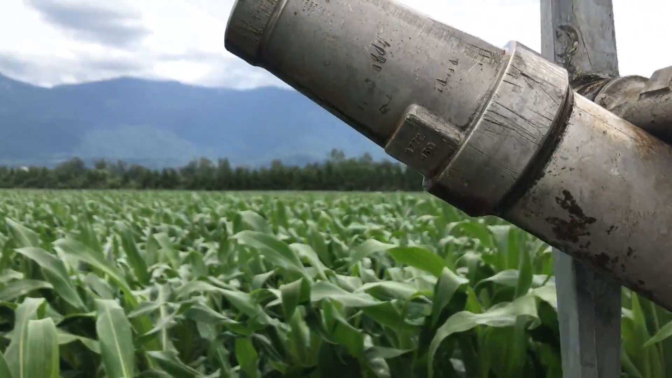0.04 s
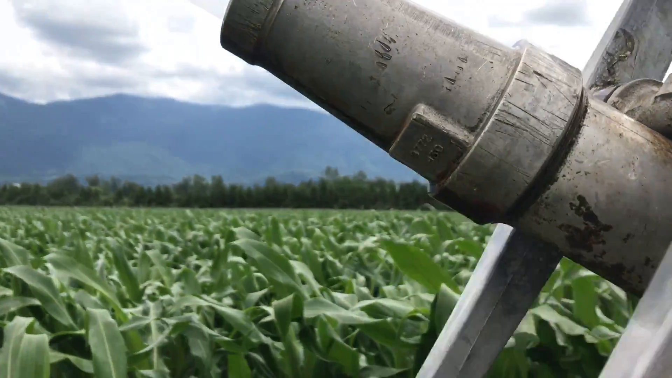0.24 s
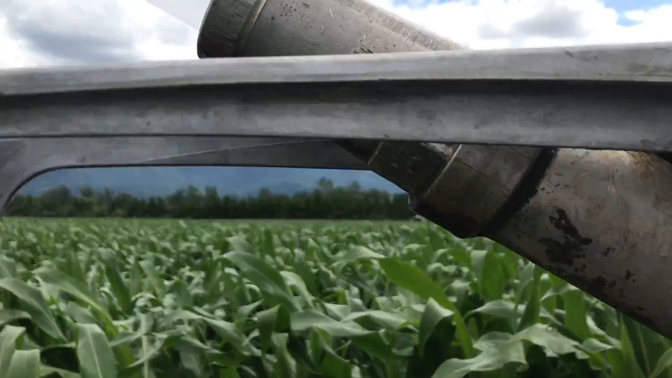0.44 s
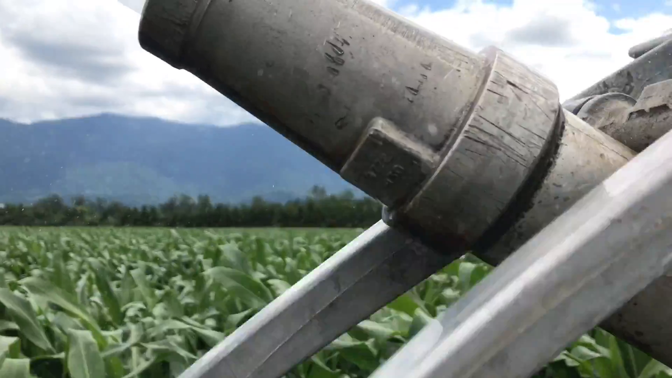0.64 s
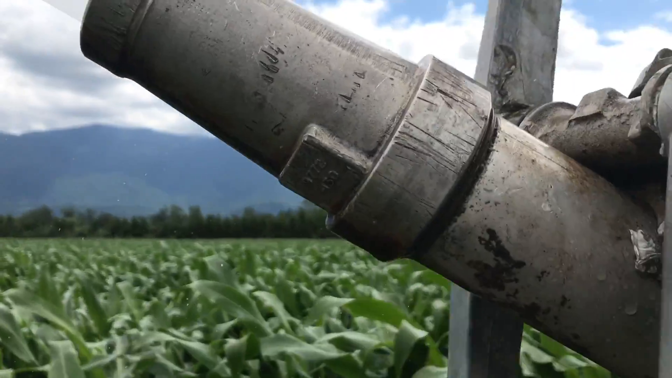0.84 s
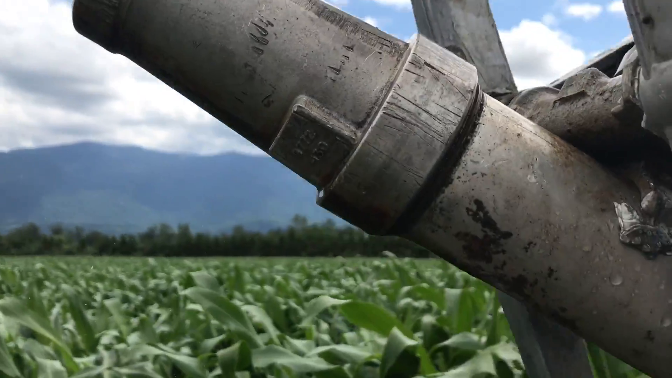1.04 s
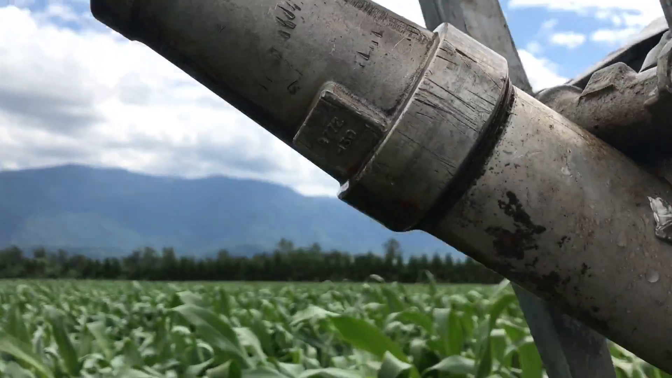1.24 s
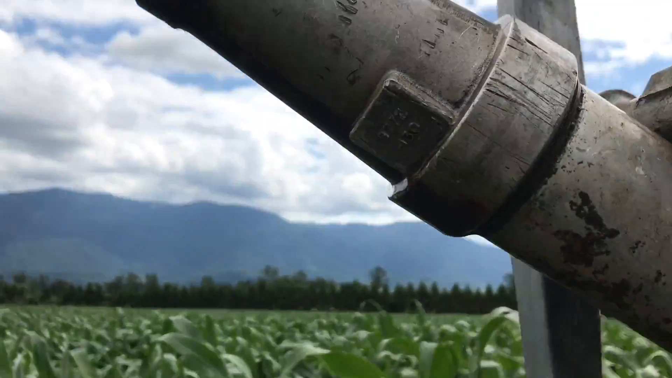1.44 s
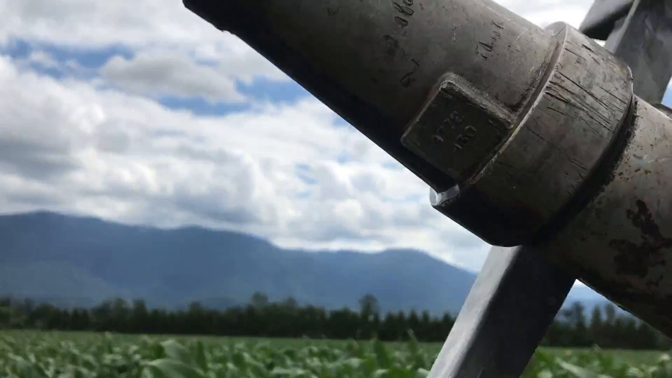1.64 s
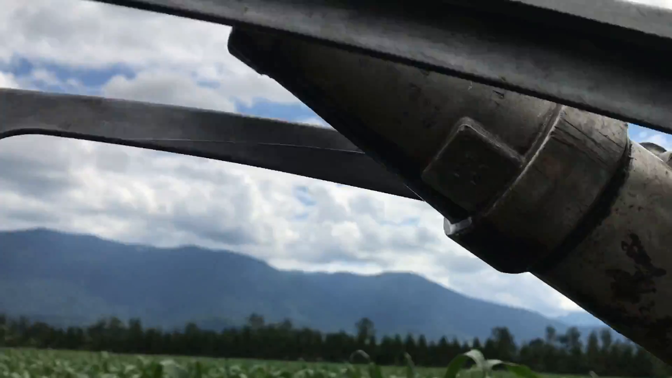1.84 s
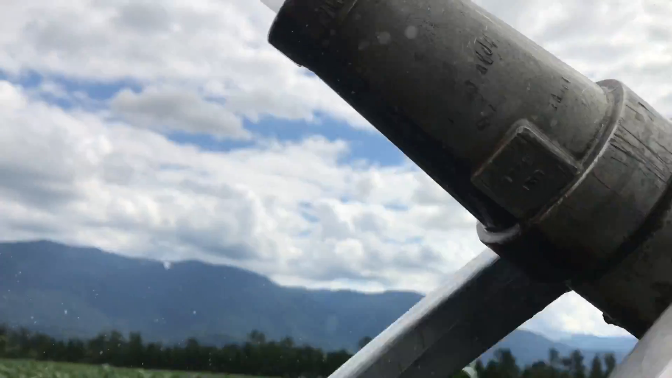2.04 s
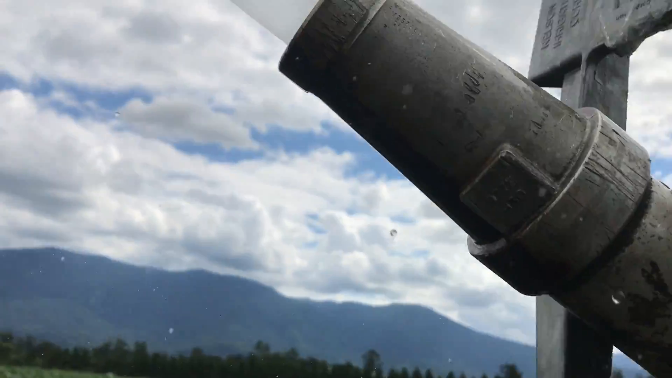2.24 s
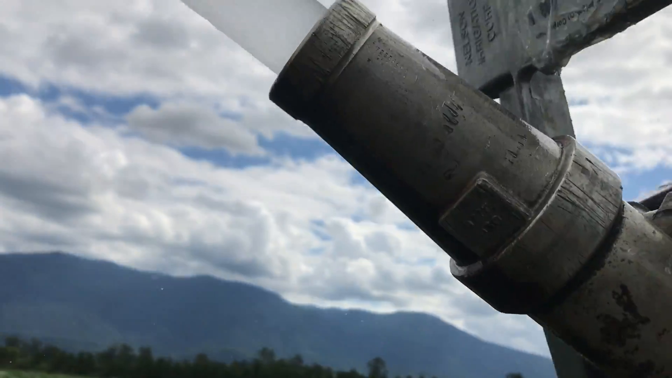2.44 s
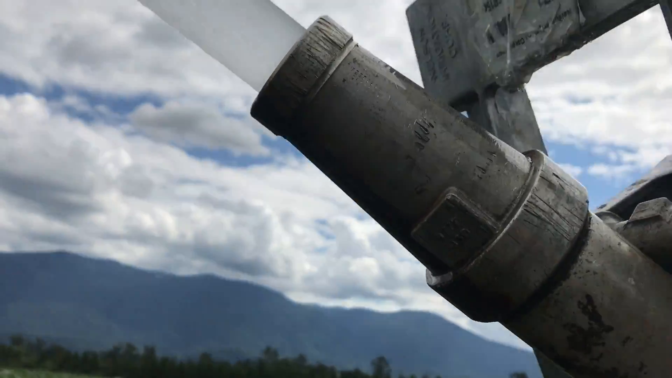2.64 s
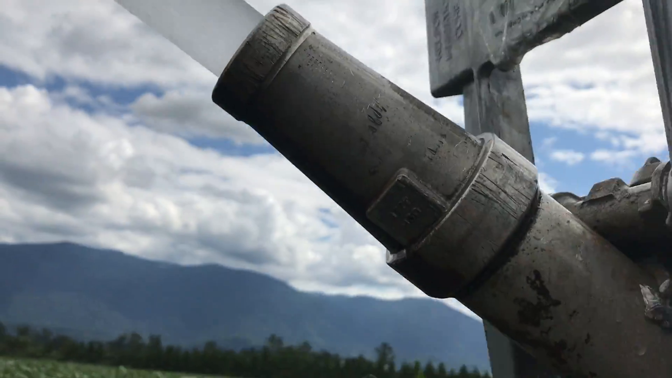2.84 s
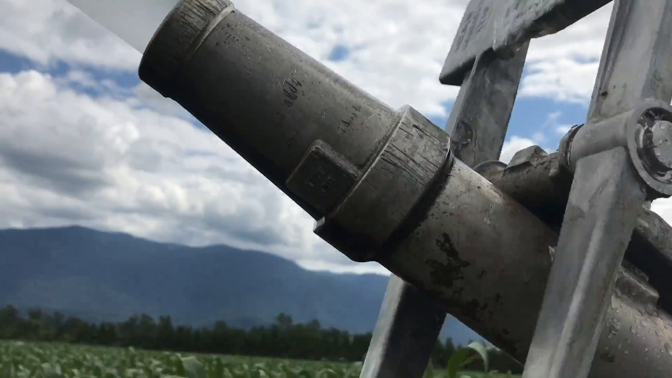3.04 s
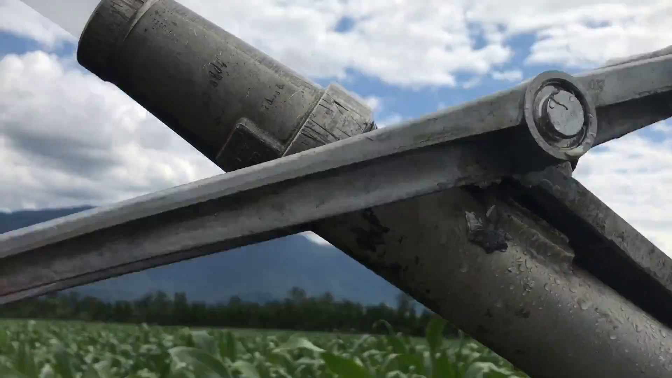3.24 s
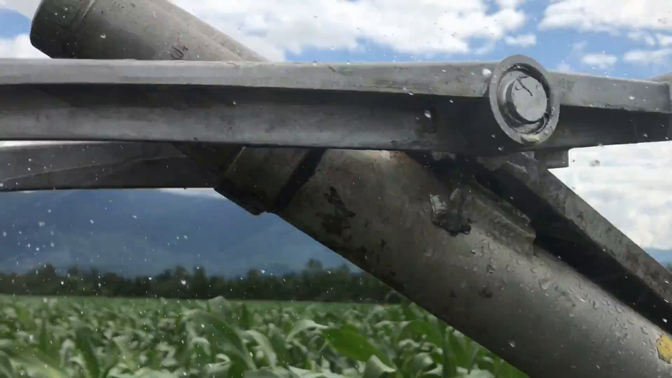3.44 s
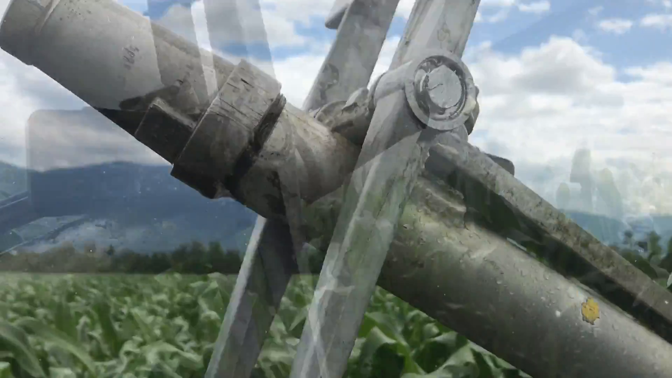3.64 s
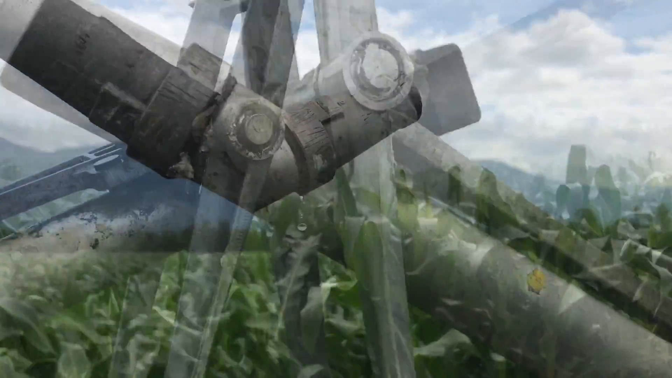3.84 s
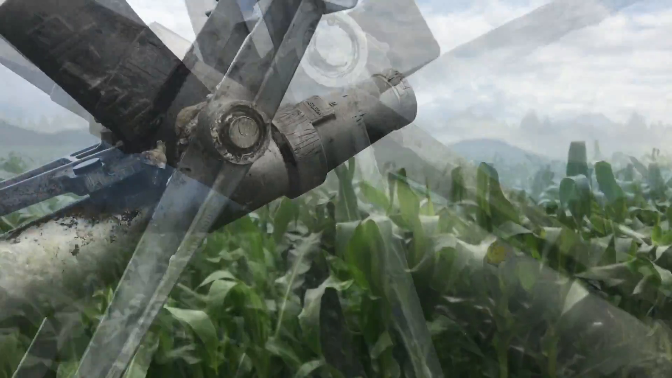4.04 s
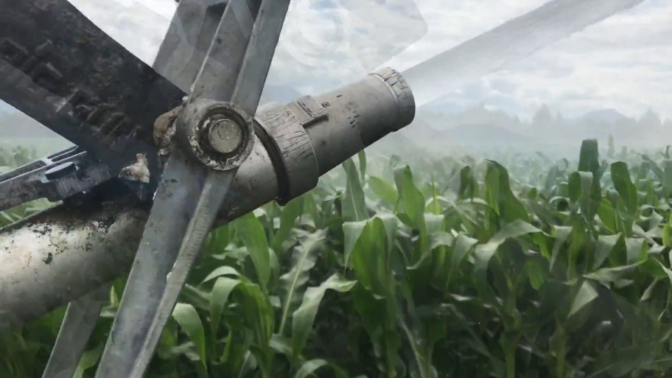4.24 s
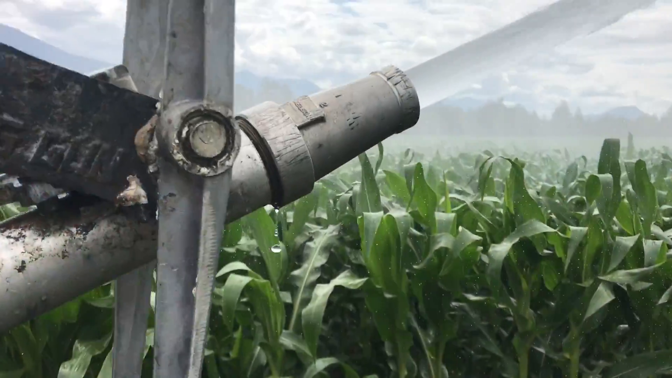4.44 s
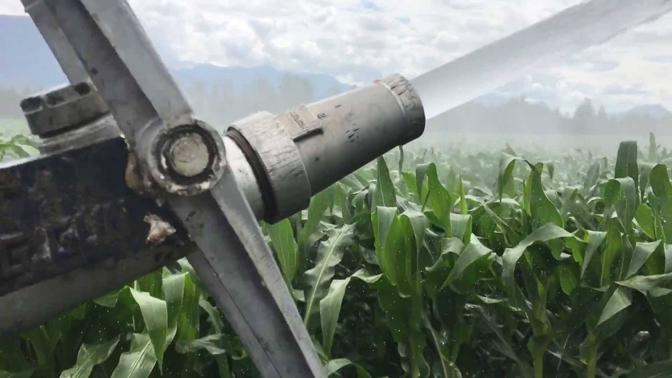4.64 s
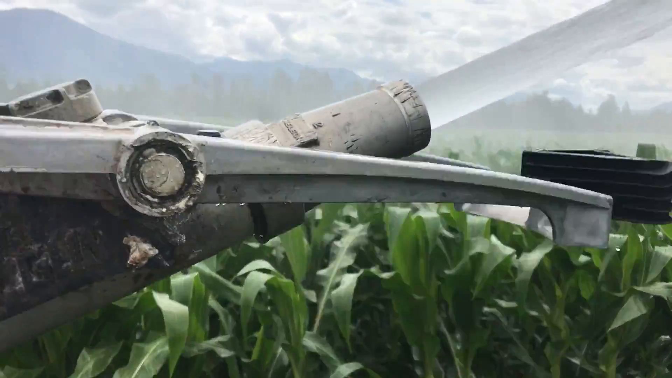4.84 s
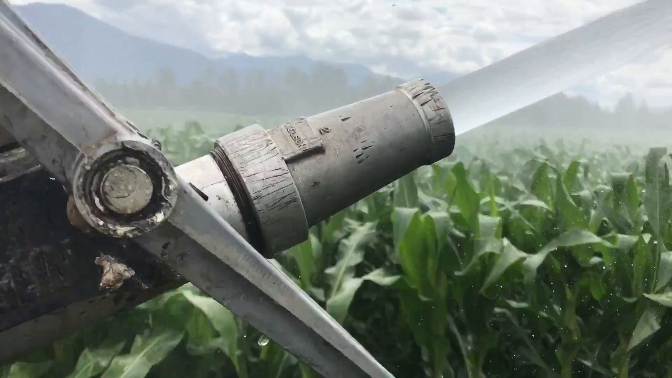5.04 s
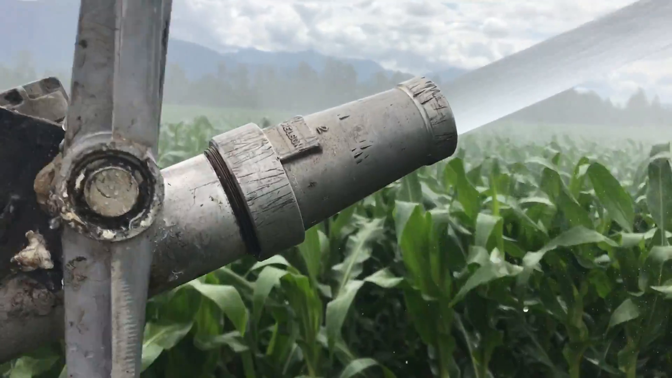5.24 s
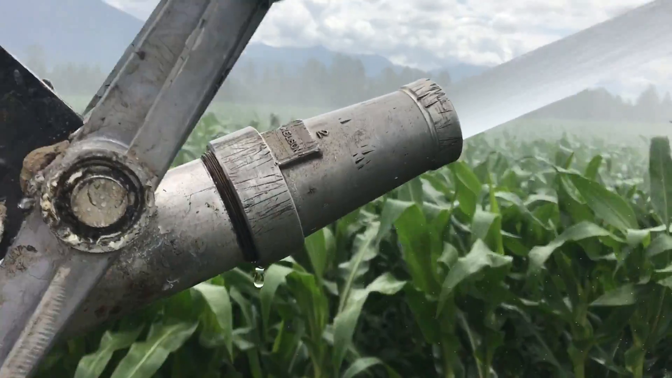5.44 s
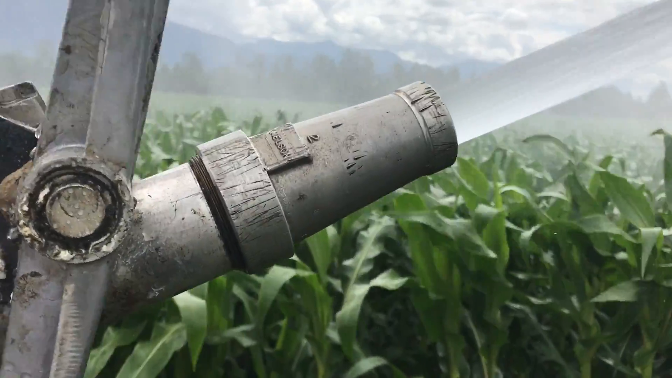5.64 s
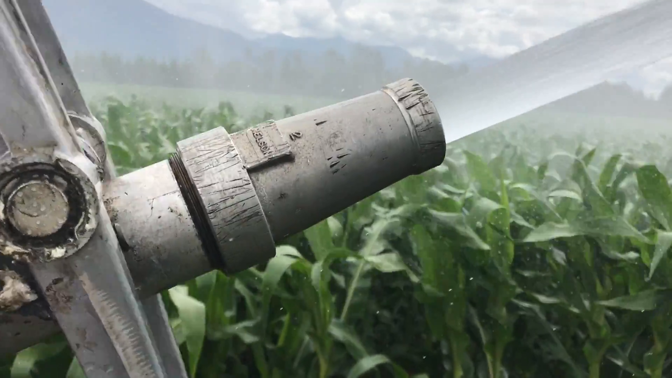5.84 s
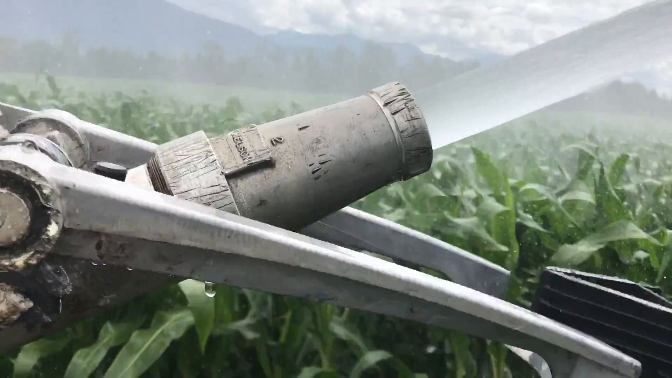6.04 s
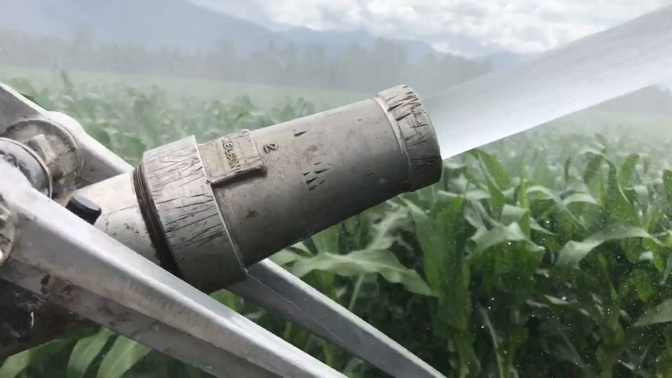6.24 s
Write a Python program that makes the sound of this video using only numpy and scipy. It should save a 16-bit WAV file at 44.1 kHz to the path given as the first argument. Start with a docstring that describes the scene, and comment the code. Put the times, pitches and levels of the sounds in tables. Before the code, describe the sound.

Outdoors, very close to a big irrigation gun, a fine grainy water jet hisses steadily over faint low wind. At 0.4 s a bright, clattering metal knock sounds, followed at 0.6 s by a loud, tearing wet slap and a hard clack on the stop; twangy rattles and tiny high ticks follow until about 0.95 s, with another faint rattle near 1.25 s. The stroke repeats with a knock at 1.8 s and slap at 2.0 s, then again at 3.26 and 3.47 s. From about 3.0 to 4.6 s the hiss blends into a second, more fluttering, less bright jet. Wind grows, with low thumping buffets. This gun knocks at 4.8 s, slaps at 5.0 s, then knocks several times and rattles until 5.6 s. A last knock comes at 6.0 s and slap at 6.2 s. Each slap leaves a dull fading rush, and the microphone briefly ducks after loud bursts.

```python
"""In a maize field, two big irrigation guns play close up, the first dissolving into the second.
Each jet is shaped noise that hisses steadily; filtered noise makes the wind that buffets the microphone.
Each drive arm knocks at the top of its swing (ringing modes and clatter) and slaps through the water
(noise bursts that ring its spoon). Then the first clacks on its stop and the second knocks several times,
with rattling twangs and small high ticks. The microphone's limiter ducks loud bursts, then lets go."""
import sys
import numpy as np
from scipy import signal
from scipy.fft import rfft, irfft, next_fast_len
from scipy.io import wavfile
from scipy.ndimage import uniform_filter1d, minimum_filter1d

SR = 44100
rng = np.random.default_rng(int(sys.argv[2]) if len(sys.argv) > 2 else 0)


def transcribe(signal):
    """Save signal, clipped to [-1, 1], as a 16-bit WAV file at the path in sys.argv[1]."""
    frames = np.atleast_2d(signal).T
    limited = np.clip(frames, -1, 1)
    pcm = np.round(limited * 32767).astype(np.int16)
    wavfile.write(sys.argv[1], SR, pcm)


N = 277830
T = np.arange(N) / SR

# colours of hiss, splash and metal: (frequency [Hz], relative level per hertz [dB])
FIRST_HISS = [(80, -19), (160, -2.5), (340, -1.5), (450, -3.5), (820, -3.5), (1100, -1.5), (1950, -4.5),
              (2800, -4), (3700, -1.5), (6200, -0.5), (9300, -2), (11000, -5), (13000, -4), (15800, -10)]
SECOND_HISS = [(100, -14), (300, -4), (800, -2), (1200, -0.5), (1550, -1.2), (2100, -6), (2800, -7),
               (4200, -2), (6000, -2.5), (9000, -6), (12000, -7.5), (15800, -11.5)]
SPLASH = [(60, -14), (250, -9.5), (480, -9.5), (900, -5), (1350, 0.5), (2200, -0.5), (2800, -2), (3400, -1),
          (4400, -0.5), (6300, 1), (9000, -1.5), (12000, -5), (15800, -10)]
CLATTER = [(100, -21), (300, -2.5), (850, -7.5), (1300, -5), (2500, 2), (3600, -3.5), (6000, -8),
           (9500, -8), (15000, -5)]
TWANG = [(120, -10), (260, 2.5), (500, -4.5), (1500, 0), (2900, 1), (4300, -5.5), (6500, -9), (15000, -22)]
# ringing modes of arms, stop and spoons: (frequency [Hz], relative level [dB], time to fall 60 dB [s])
FIRST_ARM = [(1120, -8.5, 0.14), (1217, -8, 0.078), (1495, 0, 0.12), (1700, -6, 0.071), (2360, -3, 0.044),
             (2540, 0, 0.028), (3050, 2, 0.045), (4110, 2.5, 0.041), (6200, 4, 0.031), (9450, -3, .04)]
SECOND_ARM = [(1180, -14, .08), (1397, -3, 0.091), (1482, 1.5, 0.11), (1643, 0.5, 0.045), (2300, -7, 0.035),
              (2510, -8, 0.042), (4400, -11, 0.091), (5922, 1, .06)]
STOP = [(758, -19, 0.16), (1136, -3.5, 0.038), (1434, -4.5, 0.1), (1726, 1, 0.039), (2200, -3.5, 0.049),
        (2390, -11, 0.052), (2620, 1, 0.036), (3220, 0, 0.023), (4075, 4.5, 0.051), (4180, -8, 0.078),
        (5330, -7, .05)]
FIRST_SPOON = [(1587, 1, 0.034), (1662, -1, 0.032), (2240, -38, 0.064), (3350, 2.5, 0.018),
               (5470, -2, 0.027), (7200, -2, .04)]
SECOND_SPOON = [(1507, 0.5, 0.047), (2220, 2, 0.036), (4270, 4.5, 0.021), (6370, 3.5, 0.025),
                (6860, -11, 0.048)]
# breeze before its trim and churn: (time [s], level [dB])
BREEZE = [(0, -51.5), (.9, -48), (1.5, -51), (2.9, -47.5), (3.2, -44), (4.05, -47), (4.35, -42.5),
          (5.5, -36), (6.3, -35.5)]
# strong buffets on the microphone: (time [s], half length [s], level [dB], upper edge [Hz])
BUFFETS = [(3.405, .018, -27.5, 110), (4.822, 0.012, -30, 90), (5.1, 0.011, -17.5, 228),
           (5.275, 0.02, -23, 150), (5.449, .014, -18.5, 160), (5.506, 0.031, -26, 180),
           (5.843, .018, -23.5, 284), (5.984, 0.015, -22, 347), (6.019, 0.0052, -17, 352)]
# dips and a peak of the microphone port: (frequency [Hz], width [Hz], gain [dB])
PORT = [(4930, 200, -3), (7630, 450, -2), (9240, 910, 1.5), (10430, 360, -4)]
# strokes of the drive arm: (time the spoon meets the jet [s], slap [dB], lead of the top knock [s],
# knock [dB], contacts after the slap [dB], puff of air [dB])
STROKES = [(.605, -7, .203, -13.5, -5.5, -20.5), (1.996, -8, 0.2, -12.5, -2.5, -18.5),
           (3.467, -7.5, .2037, -12.5, -3.5, -29), (4.995, -10, .2115, -10.5, -13.5, -37),
           (6.226, -12.5, .2068, -9.5, -19, -33)]
# contacts within every top knock: (time after the first [s], relative level [dB], brightness [Hz])
FIRST_KNOCK = [(0, -2, 3240), (.0028, 0.5, 2200), (.0057, 0, 11900), (0.0141, -5.5, 2980)]
SECOND_KNOCK = [(0, 0, 2516), (.022, -5.5, 1900)]
# contacts after the slap: the first arm clacks on its stop, the second knocks several times:
# (time after the slap begins [s], relative level [dB], brightness [Hz])
FIRST_STOP_CLACK = [(0.0586, 0, 5970), (.066, -10, 2500)]
SECOND_LATE_KNOCKS = [(.027, 1.5, 3400), (.099, -2.3, 1500), (.2185, 1, 1500), (.243, -5, 2400)]
# the arm rattles back: (time [s], level [dB], first gap [s], length [s], fall per bounce [dB])
RATTLES = [(.8226, -20, .024, .055, 5), (.897, -23.5, 0.028, .04, 4), (1.2385, -24.5, 0.052, .07, 0),
           (2.2122, -15.5, 0.034, .1, 3), (3.6824, -21.5, .025, .035, 3), (3.714, -21.5, .015, .035, 2),
           (5.204, -23, .033, .005, 0), (5.237, -17.5, .013, .02, 6), (5.546, -17.5, 0.048, .065, 6.5)]
# runs of small high ticks: (time [s], level [dB], first gap [s], length [s], fall per bounce [dB])
TICK_RUNS = [(.855, -7, 0.009, .016, 0), (.8935, -11, 0.023, .05, 4.5), (3.5405, -12, .012, .005, 0),
             (3.718, -12.5, 0.015, .017, 7), (3.7822, -13.5, 0.0096, .015, 3), (3.8205, -19, .01, .005, 0),
             (5.2122, -11, .029, .005, 0), (5.241, -8, .022, .05, 6)]

FIRST_JET_DB, SECOND_JET_DB = -28, -29  # hiss level outside the crossfade
FADE_OUT_S, FADE_IN_S = (3.04, 4.42), (3.28, 4.56)  # first jet leaves, second jet enters (start, end)
CHANGE_S = 4  # arm sounds from here on belong to the second gun
CUT_S = .039  # time that the spoon stays in the jet
BOUNCE_RATIO = .9  # each gap between bounces is this share of the one before
CATCH_S, CATCH_DB = .0202, -11  # the second arm ticks once, this long after each top knock
TOP_HZ = 15850  # upper edge of the microphone


def amp(db):
    """Turn decibels into gain."""
    return 10 ** (np.asarray(db) / 20)


def unit(x):
    """Scale to rms 1."""
    return x / np.sqrt(np.mean(x ** 2))


def curve(rows):
    """Draw a gain envelope from (time [s], level [dB]) rows."""
    return amp(np.interp(T, *np.transpose(rows)))


def add(out, s, x):
    """Mix a short sound in at s seconds."""
    i = int(s * SR)
    out[i:i + len(x)] += x[:max(N - i, 0)]


def colour(x, spectrum):
    """Shape by (frequency [Hz], level [dB]) points, keeping the power of white noise."""
    size = next_fast_len(len(x))
    hz, db = np.transpose(spectrum)
    bins_hz = np.fft.rfftfreq(size, 1 / SR)
    gain = amp(np.interp(np.log(bins_hz + 1), np.log(hz), db))
    return irfft(rfft(x, size) * unit(gain), size)[:len(x)]


def cut(x, hz, kind, order=2):
    """Low-pass or high-pass with a Butterworth filter."""
    sos = signal.butter(order, min(hz, .45 * SR), kind, fs=SR, output="sos")
    return signal.sosfilt(sos, x)


def fade(t, t60):
    """Decay exponentially, by 60 dB in t60 seconds."""
    return np.exp(-np.log(1000) * t / t60)


def walk(rate):
    """Wander at random between new values, about rate of them a second, with a spread near 1."""
    k = int(SR / rate)
    steps = np.repeat(rng.standard_normal(N // k + 1), k)
    return unit(uniform_filter1d(steps, k)[:N])


def ring(modes):
    """Ring a metal part as decaying sines; every blow meets its modes in other phases."""
    t = T[:SR // 4]
    out = np.zeros(len(t))
    for hz, db, t60 in modes:
        out += amp(db) * fade(t, t60) * np.sin(2 * np.pi * (hz * t + rng.random()))
    return out


def jet(level, spectrum, flutter_db, grain_db):
    """The stream tears into droplets: a fine grainy hiss that flutters over a smooth rush."""
    rush = rng.standard_normal(N)
    grains = unit(rng.standard_normal(N) * amp(grain_db * walk(1500)))
    spray = grains * amp(flutter_db * walk(35))
    return unit(colour(rush + spray, spectrum)) * level


def wind(breeze_db, breeze_hz, low_hz, churn_db, puff_after_s, puff_s, puff_hz):
    """Eddies rumble on the microphone; buffets stand out, and each slap throws a puff of air."""
    def eddies(hz):
        """Low rumble of rms 1 from low_hz up to hz."""
        rumble = cut(rng.standard_normal(N), hz, "low")
        return unit(cut(rumble, low_hz, "high", order=4))
    out = eddies(breeze_hz) * curve(BREEZE) * amp(breeze_db + churn_db * walk(12))
    puffs = [(s + puff_after_s, puff_s, db, puff_hz) for s, *_, db in STROKES]
    for s, width, db, hz in BUFFETS + puffs:
        swell = 1 / np.cosh(np.clip((T - s) / width, -30, 30))
        out = out + eddies(hz) * amp(db) * swell
    return out


def swings(first):
    """List (time [s], level [dB]) of top knocks, then of the slaps' later contacts, for one gun."""
    rows = [row for row in STROKES if (row[0] < CHANGE_S) == first]
    knocks = [(s - lead, db) for s, _, lead, db, *_ in rows]
    after_slaps = [(s, db) for s, *_, db, _ in rows]
    return knocks, after_slaps


def contacts(starts, pattern):
    """Play one pattern of contacts from each start: (time [s], level [dB], brightness [Hz])."""
    return [(s + after, db + rel_db, hz) for s, db in starts for after, rel_db, hz in pattern]


def blows(rows, modes, ring_db, clatter_db, clatter_t60):
    """Each blow rings the main modes and a quick noisy clatter; soft contact is duller."""
    out, t = np.zeros(N), T[:SR // 4]
    for s, db, hz in rows:
        clatter = colour(rng.standard_normal(len(t)), CLATTER) * fade(t, clatter_t60)
        metal = amp(ring_db) * ring(modes) + amp(clatter_db) * clatter
        add(out, s, amp(db) * cut(metal, hz, "low"))
    return out


def slaps(rise_s, fall_t60, spray_db, spray_t60, rough_db, first_ring_db, second_ring_db):
    """The spoon tears through the jet: a flat burst that rings the spoon, then a tail of thrown spray."""
    out, t = np.zeros(N), T[:SR // 4]
    after = np.maximum(t - CUT_S, 0)  # time since the spoon left the jet
    tail = fade(after, fall_t60) + amp(spray_db) * fade(after, spray_t60)
    contact = np.minimum(t / rise_s, 1) * tail
    for s, db, *_ in STROKES:
        force = rng.standard_normal(len(t)) * contact * amp(rough_db * walk(700)[:len(t)])
        if s < CHANGE_S:
            spoon, ring_db = ring(FIRST_SPOON), first_ring_db
        else:
            spoon, ring_db = ring(SECOND_SPOON), second_ring_db
        metal = signal.fftconvolve(force, spoon / np.linalg.norm(spoon))[:len(t)]
        add(out, s, amp(db) * (colour(force, SPLASH) + amp(ring_db) * metal))
    return out


def low_rush(db, t60, low_hz, high_hz):
    """After each slap a dull, uneven low rush comes in and fades over about a second."""
    out, t = np.zeros(N), T[:SR]
    for s, *_ in STROKES:
        add(out, s + CUT_S, fade(t, t60))
    rush = cut(rng.standard_normal(N), low_hz, "high")
    rush = unit(cut(rush, high_hz, "low", order=1))
    unevenness = amp(3.7 * walk(60))
    return amp(db) * out * rush * unevenness


def bounces(runs):
    """List (time [s], level [dB]) of a loose part's bounces: ever sooner, and weaker where a fall is set."""
    gap_shares = BOUNCE_RATIO ** np.arange(6)
    rows = []
    for s, db, gap, length, fall_db in runs:
        after = np.append(0, np.cumsum(gap * gap_shares))
        rows += [(s + a, db - fall_db * i) for i, a in enumerate(after) if a <= length]
    return rows


def jolts(rows, lag_s, t60, front_hz, tail_db, tail_t60, ring_db):
    """Bending waves run along the metal, treble first: a short falling twang that blurs into a rattle."""
    out, t = np.zeros(N), T[:SR // 4]
    hz = np.fft.rfftfreq(len(t), 1 / SR)
    slowness = np.maximum(np.sqrt(front_hz / np.maximum(hz, 500)) - 1, 0)
    # summing the delay over frequency gives the phase that makes it
    travel = np.exp(-2j * np.pi * np.cumsum(lag_s * slowness) * hz[1])
    decay = fade(t, t60) + amp(tail_db) * fade(t, tail_t60)
    for s, db in rows:
        push = colour(rng.standard_normal(len(t)), TWANG) * decay
        push = push + amp(ring_db) * ring(FIRST_ARM if s < CHANGE_S else SECOND_ARM)
        add(out, s, amp(db) * irfft(rfft(push) * travel, len(t)))
    return out


def ticks(rows, hz, sweep, sweep_s, t60, grit):
    """Tiny contacts: each slides up into a high, gritty ring that dies within milliseconds."""
    out, t = np.zeros(N), T[:SR // 30]
    envelope = (1 - np.exp(-t / sweep_s)) * fade(t, t60)
    for s, db in rows:
        settled_hz = hz * (1 + 0.0097 * rng.standard_normal())
        pitch = settled_hz * (1 - sweep * np.exp(-t / sweep_s))
        tone = np.sin(2 * np.pi * np.cumsum(pitch) / SR)
        scrape = cut(cut(rng.standard_normal(len(t)), 4500, "high"), hz, "low")
        add(out, s, amp(db) * (tone + grit * scrape) * envelope)
    return out


def limiter(x, ceiling_db, hold_s, release_s):
    """Gain drops at once on a loud burst, holds, then comes back quickly."""
    loud = np.sqrt(uniform_filter1d(x ** 2, size=220) + 1e-9)
    hold, release = int(hold_s * SR) | 1, int(release_s * SR) | 1  # odd window lengths
    wanted = np.minimum(amp(ceiling_db) / loud, 1)
    # both windows look back in time
    held = minimum_filter1d(wanted, hold, origin=hold // 2, mode="nearest")
    eased = uniform_filter1d(held, release, origin=release // 2, mode="nearest")
    gain = np.minimum(held, eased)
    return x * uniform_filter1d(gain, size=64)


def scene():
    """Mix both guns and the wind, the same in each ear."""
    first_level = amp(FIRST_JET_DB) * np.interp(T, FADE_OUT_S, (1, 0))
    second_level = amp(SECOND_JET_DB) * np.interp(T, FADE_IN_S, (0, 1))
    water = jet(first_level, FIRST_HISS, flutter_db=0.6, grain_db=2.0)
    water = water + jet(second_level, SECOND_HISS, flutter_db=1.95, grain_db=0.5)
    water = water + slaps(rise_s=0.011, fall_t60=0.042, spray_db=-16, spray_t60=0.28, rough_db=1.4,
                          first_ring_db=-7.0, second_ring_db=-8)
    rush = low_rush(db=-32.5, t60=0.97, low_hz=170, high_hz=720)

    first_knocks, first_after_slaps = swings(first=True)
    second_knocks, second_after_slaps = swings(first=False)
    first_tops = contacts(first_knocks, FIRST_KNOCK)
    second_blows = contacts(second_knocks, SECOND_KNOCK)
    second_blows = second_blows + contacts(second_after_slaps, SECOND_LATE_KNOCKS)
    first_clacks = contacts(first_after_slaps, FIRST_STOP_CLACK)
    metal = blows(first_tops, FIRST_ARM, ring_db=-9, clatter_db=2.5, clatter_t60=0.031)
    metal = metal + blows(second_blows, SECOND_ARM, ring_db=-3.5, clatter_db=0.5, clatter_t60=0.066)
    metal = metal + blows(first_clacks, STOP, ring_db=-5.5, clatter_db=-5.0, clatter_t60=0.071)
    metal = metal + jolts(bounces(RATTLES), lag_s=0.002995, t60=0.031, front_hz=4506,
                          tail_db=-9.5, tail_t60=0.24, ring_db=-11.5)
    catches = [(s + CATCH_S, CATCH_DB) for s, _ in second_knocks]
    metal = metal + ticks(bounces(TICK_RUNS) + catches, hz=8900, sweep=0.27, sweep_s=0.00042,
                          t60=0.0095, grit=0.84)

    air = wind(breeze_db=1.5, breeze_hz=108, low_hz=42.0, churn_db=3.0,
               puff_after_s=0.047, puff_s=0.014, puff_hz=110)
    return np.tile(water + rush + metal + air, (2, 1))


def record(dry):
    """One microphone: port colour, limiter, hard clipping and a steep top, sent to both ears."""
    hz = np.fft.rfftfreq(N, 1 / SR)
    port_db = sum(db * np.exp(-((hz - centre) / width) ** 2) for centre, width, db in PORT)
    x = irfft(rfft(dry[0]) * amp(port_db), N)
    x = limiter(x, ceiling_db=-8.5, hold_s=0.16, release_s=0.053)
    steep_top = signal.ellip(10, .1, 80, TOP_HZ, fs=SR, output="sos")
    x = signal.sosfilt(steep_top, np.clip(x, -.95, .95))
    return np.tile(x, (2, 1))


dry = scene()
out = record(dry)
transcribe(out)
```